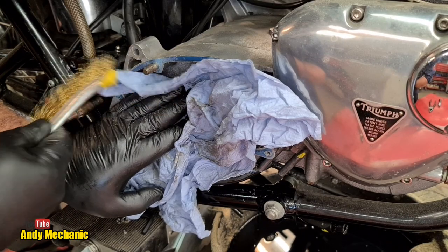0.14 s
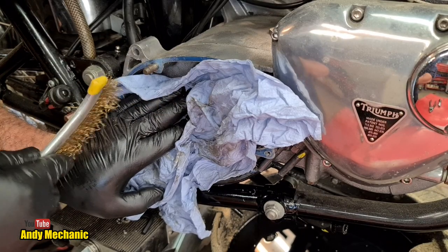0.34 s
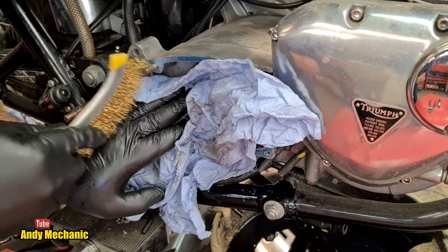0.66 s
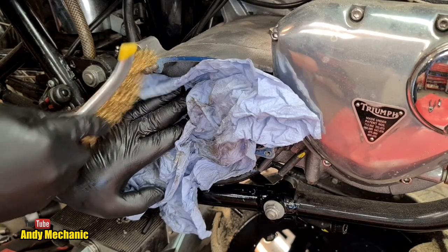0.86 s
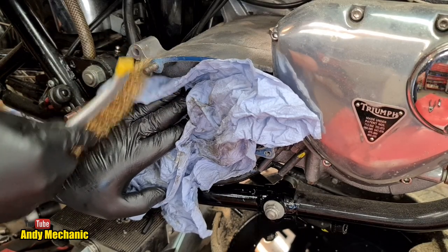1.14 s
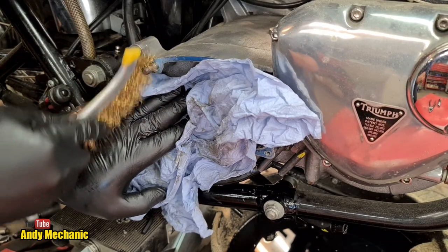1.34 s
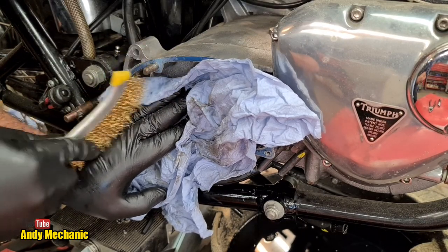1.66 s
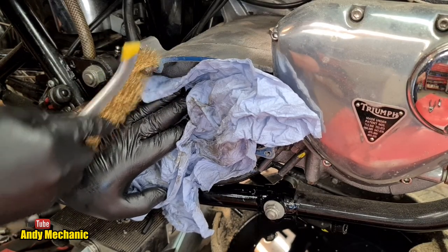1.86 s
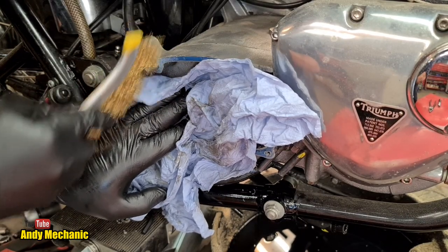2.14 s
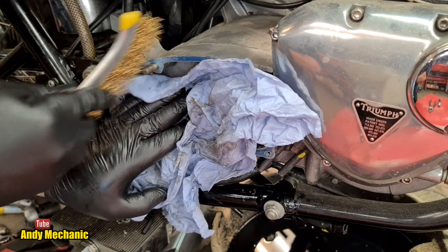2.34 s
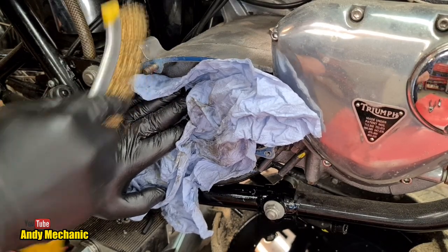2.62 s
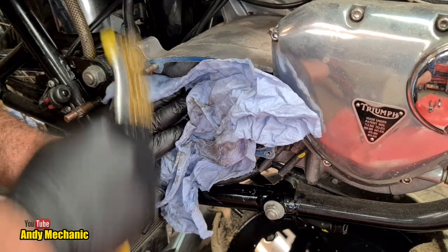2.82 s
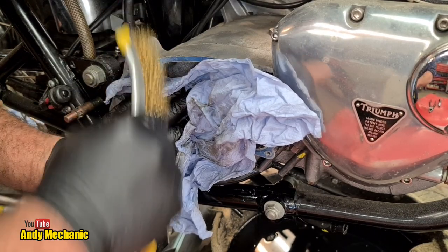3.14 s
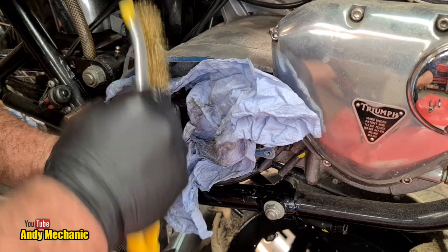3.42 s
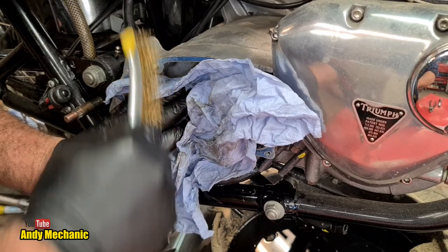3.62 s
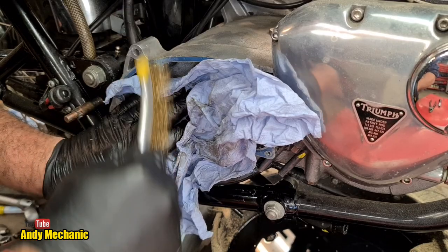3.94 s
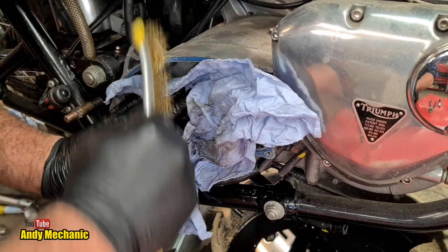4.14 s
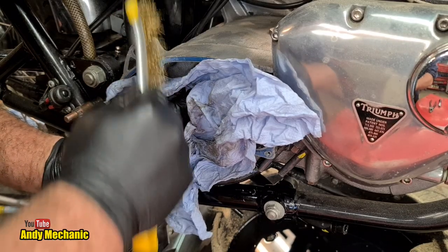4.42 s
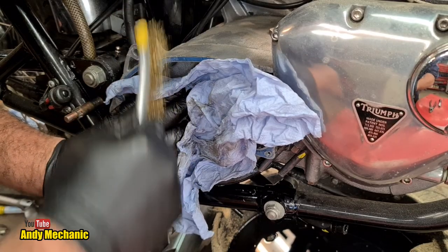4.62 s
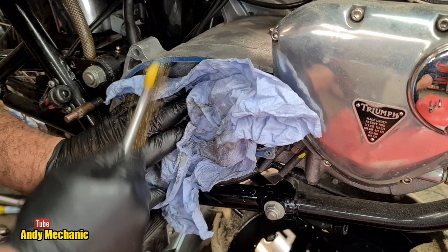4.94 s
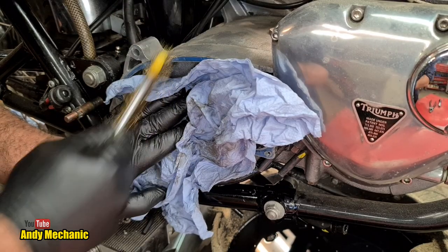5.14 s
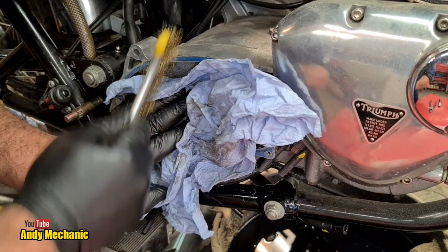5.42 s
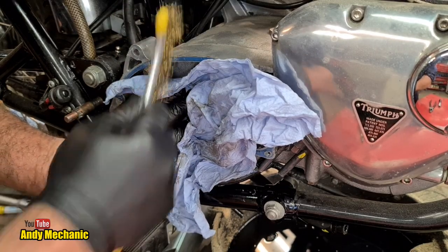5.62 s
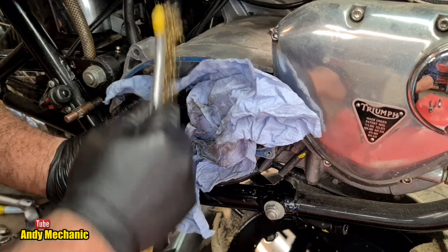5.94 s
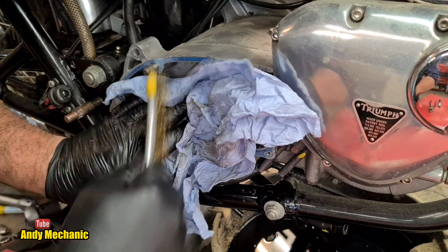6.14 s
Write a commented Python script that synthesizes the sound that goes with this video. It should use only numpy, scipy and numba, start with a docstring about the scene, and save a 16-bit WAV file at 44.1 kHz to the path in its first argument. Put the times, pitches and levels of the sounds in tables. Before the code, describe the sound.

A small wire brush scrubs hardened sealant off a metal engine casing, close to the microphone in a workshop. Steady, scratchy strokes with a bright sizzle and small snagging ticks give way to short separate strokes, about three a second. The casing rings faintly under the bristles, a gloved hand bumps dully and a paper rag rustles softly. A low room hum lies underneath.

```python
"""A small brass wire brush scrubs hardened sealant off an aluminium engine casing, close by in a workshop.
Steady, scratchy strokes give way to short separate ones. Wire tips catch and slip by the thousand, and
each tuft rings briefly. Tufts snag on edges, the casing rings when the brush leans on it, a gloved hand
bumps the engine and a paper rag rustles. The brush squeaks faintly on its way back; the room hums."""
import sys
import numpy as np
from scipy import signal
from scipy.fft import rfft, irfft
from scipy.io import wavfile
from numba import njit

SR = 44100
rng = np.random.default_rng(int(sys.argv[2]) if len(sys.argv) > 2 else 0)


def generate_wav(signal):
    """Clip the signal to [-1, 1] and save it as 16-bit WAV at the path in sys.argv[1]."""
    frames = np.transpose(np.atleast_2d(signal))
    scaled = np.clip(frames, -1, 1) * 32767
    pcm = np.round(scaled).astype(np.int16)
    wavfile.write(sys.argv[1], SR, pcm)


N = 276507
T = np.arange(N) / SR

# Brush strokes, each a light skate and then a hard push: touch-down t/s, skate length/s, push length/s,
# skate level/dB, push level/dB, landing level/dB, tip sizzle/dB, skating ring/dB, hand thump/dB
STROKES = [(0.0, 0.041, 0.097, -38, -28.0, -37, 2.5, -9, -49),
           (0.57, 0.044, 0.095, -39, -32, -40, 2, -20, -60),
           (0.787, 0.038, 0.16, -44, -33.5, -38, 3.0, -7, -52),
           (1.052, 0.069, 0.077, -36.5, -31, -47, 4.5, -11.5, -63),
           (1.3, 0.077, 0.07, -37.5, -32, -58, 4.5, -10, -64),
           (1.555, 0.052, 0.083, -35.5, -31.0, -35, 5, -8, -55),
           (1.802, 0.064, 0.09, -44.5, -32, -56, 3.5, -15, -69),
           (2.101, 0.042, 0.085, -46, -29.5, -34.5, 1.9, -7, -54.5),
           (2.385, 0.015, 0.11, -42, -30.5, -46, 1.7, -16, -58),
           (2.776, 0.015, 0.099, -40.5, -34, -48, 0.3, -5, -62),
           (3.124, 0.017, 0.098, -48, -31, -60, -0.5, -15, -45.5),
           (3.458, 0.016, 0.08, -40.5, -31.0, -50.0, -0.4, -13, -70),
           (3.742, 0.048, 0.088, -43.5, -30.5, -36.5, -0.6, -8.5, -53.0),
           (4.09, 0.038, 0.096, -40, -29, -57, -1.3, -7.5, -50),
           (4.424, 0.028, 0.1, -39.5, -29.5, -40, -1.4, -5.5, -46.5),
           (4.757, 0.039, 0.1, -40, -30.0, -38, -0.1, -14, -52.5),
           (5.06, 0.045, 0.11, -45.5, -31.0, -44, 1.2, -20, -60.5),
           (5.398, 0.03, 0.1, -51.5, -31.5, -35, 0, -12, -70),
           (5.701, 0.053, 0.11, -42.5, -31.0, -38.0, -0.3, -8.5, -50.5),
           (6.025, 0.039, 0.097, -40.0, -28.5, -45, -0.6, -7.5, -45)]
# a tuft snags on an edge and springs free: t/s, relative level/dB
SNAGS = [(0.0463, -13), (0.0797, -14), (0.0964, -14), (0.1356, -15), (0.1434, -15), (0.1534, -16),
         (0.5881, -13), (0.8235, -21), (0.8619, -18), (0.897, -18), (0.921, -16), (0.9717, -13),
         (1.1298, -16), (1.3174, -20), (1.3339, -18), (1.419, -17), (1.5768, -18), (1.643, -14),
         (1.8038, -27), (1.8467, -19), (1.9894, -24), (2.061, -28), (2.117, -18), (2.2084, -13),
         (2.3341, -24), (2.5122, -18), (2.8644, -20), (3.1223, -24), (3.146, -21), (3.1966, -16),
         (3.4805, -17), (5.0594, -30), (5.462, -14), (5.6999, -31), (5.7229, -23), (5.7648, -18),
         (6.0696, -16)]
TOUCH_S, LIFT_S = 0.0063, 0.036  # time for the wires to reach the metal, and to lift off


def undb(db):
    """Turns decibels into a factor to multiply by."""
    return 10 ** (np.asarray(db) / 20)


def curve(rows):
    """Joins (time, value) points with straight lines."""
    return np.interp(T, *np.transpose(rows))


def wander(rate):
    """A random drift of size near 1, with a new target `rate` times a second."""
    return 1.038 * np.interp(T * rate, np.arange(N // 20), rng.standard_normal(N // 20))


def swells(rows):
    """A bell-shaped rise and fall for each row of t/s, half length/s, level/dB."""
    return sum(undb(db) * np.exp(-.5 * ((T - s) / half) ** 2) for s, half, db, *_ in rows)


def colour(x, points, size=2048):
    """Shapes the tone of x along points of f/Hz, relative level/dB."""
    hz, db = np.transpose(points)
    grid = np.maximum(np.fft.rfftfreq(size, 1 / SR), 1)
    gains = undb(np.interp(np.log(grid), np.log(hz), db))
    # folding the cepstrum keeps the filter from sounding before it is struck
    cepstrum = irfft(np.log(gains))
    cepstrum[1:size // 2] *= 2
    cepstrum[size // 2 + 1:] = 0
    response = irfft(np.exp(rfft(cepstrum)))
    return signal.oaconvolve(x, response / np.linalg.norm(response))[:N]


def ring(x, modes, detune=1, size=2048):
    """x strikes an object's natural tones (modes); wider ones die away sooner."""
    t = T[:size]
    response = 0
    for k, (hz, width, db) in enumerate(modes):
        fade = undb(db) * width * np.exp(-np.pi * width * t)
        response += (-1) ** k * fade * np.cos(2 * np.pi * hz * detune * t)
    return signal.oaconvolve(x, response / np.linalg.norm(response))[:N]


@njit
def bandpass(x, hz, width):
    """Lets through the sound near a pitch that can move every sample."""
    y, band, low = np.empty(len(x)), 0., 0.
    for i in range(len(x)):
        step, damping = np.tan(np.pi * hz[i] / SR), width / hz[i]
        swing = (band + step * (x[i] - low)) / (1 + step * (step + damping))
        band, low = 2 * swing - band, low + 2 * step * swing
        y[i] = damping * swing
    return y


def resonate(x, hz, width_hz):
    """Makes x ring around a moving pitch, keeping the power of a noisy input."""
    width = float(width_hz)
    return bandpass(bandpass(x, hz, width), hz, width) * np.sqrt(2 * SR / (np.pi * width))


def stereo(x, pan_db, lag_ms=0.18):
    """Sound reaches the nearer left side first; a positive pan_db makes that side louder."""
    late = np.convolve(x, np.sinc(np.arange(32) - lag_ms * SR / 1000))[:N]
    return np.array([x * undb(pan_db / 2), late * undb(-pan_db / 2)])


def slips(rate, spread_db):
    """Catching and slipping: about `rate` random clicks a second, uneven in size, with mean power 1."""
    chance = np.clip(rate / SR, 1e-4, 1)
    size = undb(spread_db * np.clip(rng.standard_normal(N), -2, 2)) * rng.choice([-1, 1], N)
    clicks = (rng.random(N) < chance) * size / np.sqrt(chance)
    return clicks / np.sqrt(np.mean(clicks ** 2))


def stroke_times():
    """When each stroke touches down and lifts off."""
    times = [(touch, touch + skate + push + LIFT_S) for touch, skate, push, *_ in STROKES]
    return np.maximum.accumulate(np.ravel(times))


def per_stroke(column):
    """One column of STROKES, held for the length of each stroke."""
    return np.interp(T, stroke_times(), np.repeat(np.array(STROKES)[:, column], 2))


def scrubbing(landing_s=0.017, skate_db_per_s=92, bite_s=0.02, crest_share=0.51, arch_db=25,
              lift_db=12.5):
    """How hard the brush scrubs: each stroke lands, skates, bites in, peaks and lifts off."""
    # between the steady strokes the brush drags back over the metal: t/s, level/dB
    drag = [(0.2, -55), (0.35, -67), (0.5, -56.5), (2.3, -53), (2.55, -80)]
    strength = undb(curve(drag))
    for touch, skate, push, skate_db, push_db, landing_db, *_ in STROKES:
        age = T - touch
        pushed = age - skate
        light_db = skate_db + skate_db_per_s * np.minimum(pushed, 0)
        hard_db = push_db - arch_db * (pushed / push - crest_share) ** 2
        hard_db -= lift_db * np.maximum(pushed - push, 0) / LIFT_S
        bite = np.clip(1 + pushed / bite_s, 0, 1)
        scrub = undb((1 - bite) * light_db + bite * hard_db) * np.exp(np.minimum(age, 0) / TOUCH_S)
        landing = undb(landing_db) * np.exp(-np.abs(age) / landing_s) * (age > 0)
        strength = np.sqrt(strength ** 2 + scrub ** 2 + landing ** 2)
    return strength


def pressed(settle_s=0.045):
    """0 while the tufts skate freely, 1 once the push has pressed them down."""
    points = []
    for touch, skate, *_ in STROKES:
        points += [(touch - TOUCH_S, 1), (touch, 0), (touch + skate, 0), (touch + skate + settle_s, 1)]
    return curve(points)


def brush(tufts=6, full_db=-32, slip_rate=1700, stall_db=4, damped_db=15):
    """Tufts of wire slip over the metal: a rasp, the ring of the wires and the sizzle of their tips."""
    # pitch of the landing tufts as the grip turns the wires from flat to upright: t/s, f/Hz
    grip = [(0.1, 3030), (0.7, 2350), (2.2, 2280), (2.45, 3930)]
    # tone of the rasp and of the sizzle: f/Hz, relative level/dB
    rasp_tone = [(150, -33.5), (800, -22), (1100, -14), (1450, -7.5), (1800, -6), (2280, 2.5), (2950, 2.5),
                 (4100, 1.5), (6500, -0.5), (8500, -4.5), (16000, -14)]
    sizzle_tone = [(1500, -24.5), (4000, -6.5), (6500, 0.5), (9500, -0.5), (12000, 3), (14300, 3),
                   (16000, 4)]
    # natural tones of the wires: f/Hz, width/Hz, level/dB
    wire_modes = [(4480, 275, 1), (5080, 380, 0.5), (5435, 410, -2.5), (6050, 680, -1)]
    level_db = 20 * np.log10(scrubbing())
    effort_db = np.clip(level_db - full_db, -25, 6)
    progress = np.interp(T, stroke_times(), np.tile([-1, 1], len(STROKES)))  # -1 to 1 in each stroke
    snag, tips_db = snags(), per_stroke(column=6)
    # the whole head catches and lurches on the rough sealant
    jerk = undb(.7 * tips_db)  # strokes with more tip sizzle catch harder and sound more crackly
    drive = undb(level_db + 1.5 * jerk * wander(220) - stall_db * stalls())
    # speed and snags free more wires
    rate = slip_rate / jerk * undb(.3 * effort_db) * (1 + 2 * np.minimum(snag / drive, 2))
    # a light touch mostly rasps; wires ring more under force, less when only their tips skate
    rasp_gain = undb(-5.5 - 0.18 * effort_db)
    wire_gain = undb(-7 + 0.39 * effort_db - progress - 0.55 * tips_db)
    tip_gain = undb(-6 + tips_db + 0.24 * effort_db + 0.41 * wander(170))
    # tufts that have just landed swing at their full length and sound lower
    landing_hz = curve(grip)
    landing_gain = undb(per_stroke(column=7) - damped_db * pressed())
    seating = 1 + 0.065 * wander(7.1)  # the head never lands quite the same way twice
    out = 0
    for place in np.linspace(-1, 1, tufts):
        clicks = slips(rate, spread_db=6.5)
        force = clicks * np.hypot(drive * undb(3 * wander(450)), snag) / np.sqrt(tufts)
        stiffness = 1 + .04 * wander(14)
        rasp = colour(force * rasp_gain, rasp_tone)
        landing = resonate(force * landing_gain, landing_hz * stiffness * seating, width_hz=560)
        # bent wires wander in pitch, free ones ring at their own
        bent = resonate(force * wire_gain, 5250 * stiffness, width_hz=1280)
        free = ring(force * wire_gain * rng.choice([-1, 1], N), wire_modes, detune=1 + 0.063 * place)
        skip_db = 3.6 * jerk * wander(300)
        sizzle = colour(force * tip_gain * undb(skip_db), sizzle_tone)
        lag_ms = 0.18 + 0.049 * place
        out += stereo(rasp + landing, pan_db=1.9, lag_ms=lag_ms)
        out += stereo(bent + free, pan_db=4.5, lag_ms=lag_ms)
        out += stereo(sizzle, pan_db=5, lag_ms=lag_ms)
    return out


def workshop(floor_db=-60, apart_hz=900):
    """Mains hum and a quiet room hiss, with the bass much alike on both sides."""
    # tone of the room noise: f/Hz, relative level/dB
    room_tone = [(15, -10), (28, -20), (55, 5), (90, -3), (125, -6.5), (280, -9.5), (540, -15), (930, -18),
                 (1300, -16), (2300, -13.5), (4000, -17.5), (5200, -16), (8000, -21.5), (15500, -17.5)]
    # mains hum: f/Hz, level/dB
    hum_tones = [(50, -71), (100, -69.5)]
    mid, side = (colour(rng.standard_normal(N), room_tone) for _ in range(2))
    highpass = signal.butter(1, apart_hz, "high", fs=SR, output="sos")
    side = 0.5 * side + 0.61 * signal.sosfilt(highpass, side)
    hum = sum(np.sqrt(2) * undb(db + 0.65 * wander(13)) * np.sin(2 * np.pi * hz * T)
              for hz, db in hum_tones)
    return undb(floor_db) * np.array([mid + side, mid - side]) + hum


def stalls(lead_s=0.0061, half_s=0.0014):
    """The brush head is held back just before each snag lets go; 1 means stuck."""
    return swells([(s - lead_s, half_s, 0) for s, _ in SNAGS])


def snags(rise_s=0.00017, fall_s=0.0034, gain_db=-8):
    """A snagged tuft lets all its wires go within a few milliseconds."""
    force = np.zeros(N)
    for s, db in SNAGS:
        start = int(s * SR)
        age = T[:min(N - start, SR // 10)]
        release = (1 - np.exp(-age / rise_s)) * np.exp(-age / fall_s)
        force[start:start + len(age)] += undb(db + gain_db) * release
    return force


def hand(late_share=0.67, half_s=0.03, thump_hz=308.0):
    """The gloved hand knocks dully on the engine, and thumps it late in each push."""
    # soft knocks of the gloved hand: t/s, half length/s, relative level/dB
    bumps = [(.095, 0.0075, -39), (.14, 0.025, -42), (1.535, 0.025, -54), (2.065, 0.0085, -47.5),
             (2.338, 0.0085, -47), (5.768, 0.012, -48)]
    # tone of a dull knock: f/Hz, relative level/dB
    thud_tone = [(40, -16.5), (170, -11), (300, 4), (430, -7), (750, -9), (1500, -2), (4000, -22.5)]
    press = swells([(touch + skate + late_share * push, half_s, db)
                    for touch, skate, push, *_, db in STROKES])
    contact = undb(-2) * swells(bumps) + undb(-8) * press
    rub = colour(slips(3000, spread_db=3.5) * contact, thud_tone)
    thump = resonate(slips(3000, spread_db=10.5) * press, np.full(N, thump_hz), width_hz=94)
    return stereo(rub + undb(-15) * thump, pan_db=-3.5)


def rag():
    """Glove and paper rag shift against the engine, rustling in many tiny clicks."""
    # each shift: t/s, half length/s, level/dB
    rustles = [(0.11, 0.054, -47.5), (0.48, 0.18, -58), (1.5, 0.74, -57.5), (2.33, 0.028, -51.5),
               (3.14, 0.082, -59), (5.93, 0.074, -52), (6.17, 0.066, -52.5)]
    # tone of the rustle: f/Hz, relative level/dB
    rag_tone = [(30, 6), (70, 6), (120, 2.5), (290, 14), (450, -3), (620, 8), (900, 3.5), (2400, 12.5),
                (4000, 4.5), (5400, -40), (9000, 0.5), (15000, -12)]
    crumple = undb(1.8 * wander(90))
    rustle = colour(slips(6000, spread_db=6) * swells(rustles) * crumple, rag_tone)
    return stereo(rustle, pan_db=0.5)


def casing(climb=0.052):
    """Wires chatter on the wall, rising in pitch as they bend, and ring the hollow casing."""
    # the brush leans on the wall: t/s, half length/s, relative level/dB, f/Hz
    leans = [(0.136, 0.018, -35, 1650), (2.457, 0.013, -36.5, 1150), (2.496, 0.0062, -43, 2050),
             (3.179, 0.017, -41, 1130), (3.215, 0.0068, -35, 1910), (3.527, 0.0088, -38, 2160),
             (3.815, 0.018, -47, 1350), (4.475, 0.014, -39, 1130), (4.81, 0.015, -46, 1230),
             (6.095, 0.02, -40.5, 1200)]
    # natural tones of the casing: f/Hz, width/Hz, level/dB
    casing_modes = [(1126, 22, -3), (1337, 54, 3), (1400, 82, 2), (1810, 63, 3), (2100, 97, 1)]
    pitch = curve([(s + side * 2 * half, hz * (1 + side * climb))
                   for s, half, _, hz in leans for side in (-1, 1)])
    chatter = resonate(slips(3500, spread_db=4.5) * swells(leans), pitch, width_hz=510)
    scrape = undb(-4) * chatter + undb(-11) * ring(chatter, casing_modes)
    # the small wall gives off little sound below its lowest tone
    highpass = signal.butter(3, 900, "high", fs=SR, output="sos")
    return stereo(signal.sosfilt(highpass, scrape), pan_db=0.5)


def squeaks():
    """Light rubbing makes thin, gliding whistles as the brush is drawn back."""
    # each squeak: t/s, half length/s, level/dB, f/Hz, glide/(Hz per s)
    whistles = [(3.02, 0.022, -64, 13800, 12000), (3.085, 0.04, -60, 8600, 13000),
                (3.095, 0.018, -65, 13100, 20000), (3.39, 0.035, -65, 7050, -5500)]
    out = 0
    for s, half, db, hz, glide in whistles:
        pitch = hz + glide * np.clip(T - s, -2 * half, 2 * half)
        out += resonate(rng.standard_normal(N) * swells([(s, half, db)]), pitch, width_hz=200)
    return stereo(out, pan_db=4)


def echoes(x, fade_s, gain_db, delay_s):
    """A spray of echoes, one for each side, dying away by 60 dB in fade_s."""
    t = T[:SR // 2]
    tail = rng.standard_normal((2, len(t))) * np.exp(-np.log(1000) * t / fade_s) * (t > delay_s)
    tail /= np.linalg.norm(tail, axis=1, keepdims=True)
    return undb(gain_db) * signal.oaconvolve(x, tail, axes=1)[:, :N]


def scene(echo_paths=6):
    """The work, its quick echoes off the engine parts, and the room."""
    work = brush() + hand() + rag() + casing()
    # the moving hand keeps opening and shading the short echo paths
    paths = np.array([wander(16) for _ in range(echo_paths)])
    paths /= np.linalg.norm(paths, axis=0)
    near = sum(echoes(work * path, fade_s=0.028, gain_db=-1.5, delay_s=0.00045) for path in paths)
    far = echoes(work, fade_s=0.28, gain_db=-15.5, delay_s=0.0088)
    return work + near + far + workshop() + squeaks()


def record(dry, top_hz=15750):
    """Cuts off the highest treble steeply."""
    return signal.sosfilt(signal.ellip(10, .2, 70, top_hz, fs=SR, output="sos"), dry)


dry = scene()
out = record(dry)
generate_wav(out)
```